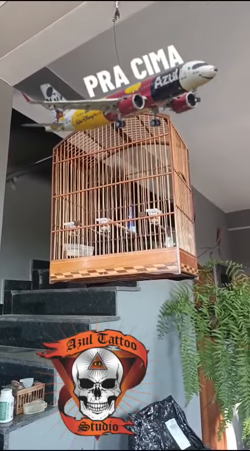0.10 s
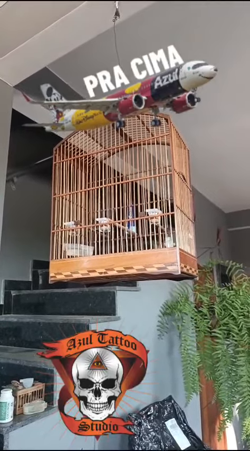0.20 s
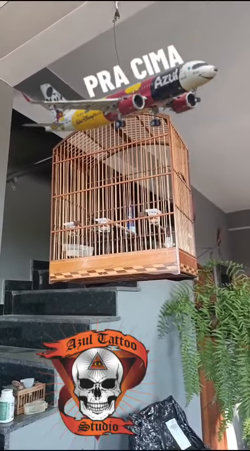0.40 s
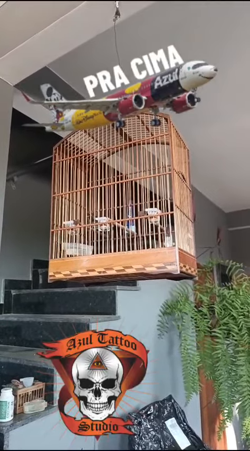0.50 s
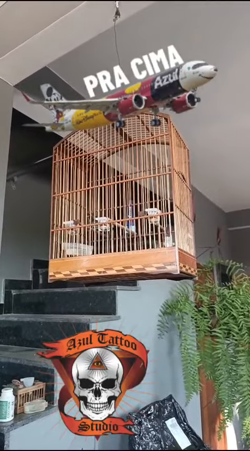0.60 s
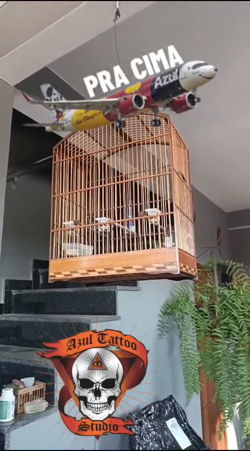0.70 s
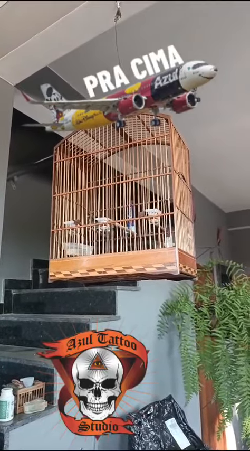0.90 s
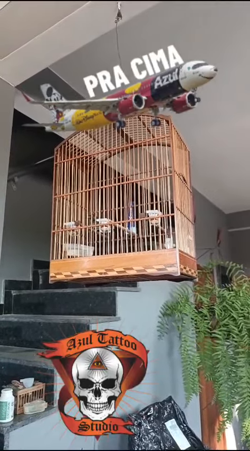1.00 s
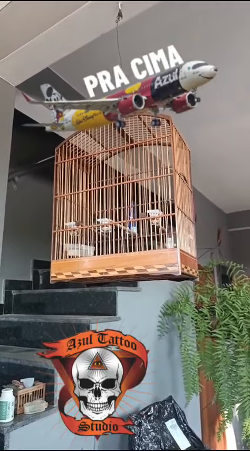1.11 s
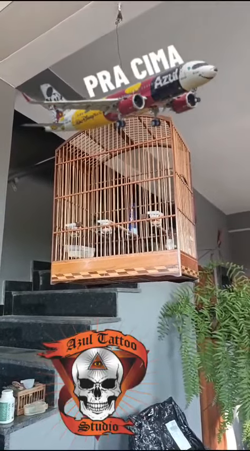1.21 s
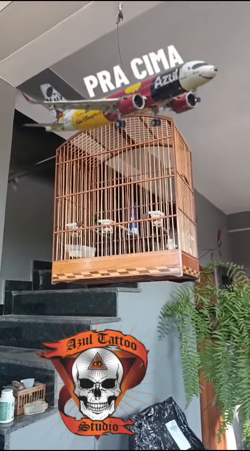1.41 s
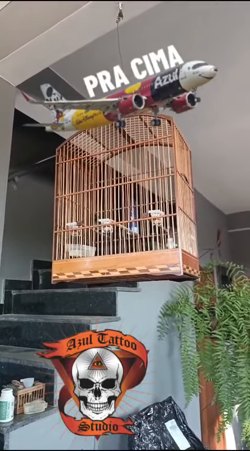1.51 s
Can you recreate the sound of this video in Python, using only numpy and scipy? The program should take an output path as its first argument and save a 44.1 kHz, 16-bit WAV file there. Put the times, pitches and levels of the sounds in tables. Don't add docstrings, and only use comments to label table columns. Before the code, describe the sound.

A small caged bird sings close by in a reverberant, hard-walled room. Thin falling chips tick from 0 to 0.2 seconds, with two tiny claw clicks on the perch. A fast buzz starts near 0.23, narrows to a piercing whistle by 0.37 and drops in two steps by 0.44. The echo fades; distant birds answer faintly, clearest around 0.7, over soft hum and far traffic.

```python
import sys
import numpy as np
from scipy import signal
from scipy.fft import rfft, irfft
from scipy.io import wavfile
from scipy.ndimage import uniform_filter1d

SR = 44100
rng = np.random.default_rng(int(sys.argv[2]) if len(sys.argv) > 2 else 0)


def volts_from_decibels(level):
    exponent = np.asarray(level, float) / 20
    return 10 ** exponent


def generate_wav(sig):
    pcm = np.round(np.clip(np.atleast_2d(sig).T, -1, 1) * 32767).astype(np.int16)
    wavfile.write(sys.argv[1], SR, pcm)


N = 68355
TOP_HZ = 15900

# (frequency [Hz], density [dB per Hz])
HOUSE_SPECTRUM = [(30, -29.5), (60, -9.5), (130, -0.5), (260, -10), (800, -17), (2300, -19), (6500, -36.5),
                  (16000, -48)]
# (frequency [Hz], decay time [s])
ROOM_T60 = [(2500, .95), (4000, .88), (5500, .8), (7700, .7), (10000, .72), (12500, .64), (16000, .5)]
# (time [s], length [s], first pitch [Hz], last pitch [Hz], level [dB])
FAR_NOTES = [(-.06, 0.069, 4503, 2790, -55.5), (0.025, 0.023, 3305, 2675, -50.5),
             (0.025, 0.06, 3797, 4283, -58), (0.045, 0.022, 3470, 2870, -60),
             (0.683, 0.025, 5940, 5500, -37), (.712, 0.01, 5480, 5060, -33.5),
             (0.738, 0.043, 4960, 3640, -43.5), (.91, 0.04, 2590, 3190, -55.5),
             (0.918, 0.02427, 5749, 5300, -82), (1.027, 0.04, 9350, 8000, -83),
             (1.155, 0.037, 6820, 7120, -71), (1.211, .022, 6050, 5070, -55.5),
             (1.251, 0.036, 5300, 3729, -64), (1.35, 0.0072, 3997, 3520, -74.5),
             (1.425, .03, 6860, 6000, -64), (1.449, 0.023, 6130, 4930, -58.5),
             (1.487, 0.033, 3570, 3830, -75)]
# (time [s], length [s], first pitch [Hz], last pitch [Hz], level [dB])
FAR_WHISTLE = [
    (0.786, 0.1, 4051, 3979, -52),
]
# (time [s], level [dB])
PERCH_TICKS = [
    (.048, -45),
    (.201, -42.5),
]
# (time [s], first pitch [Hz], last pitch [Hz], level [dB])
CHIPS = [
    (-.019, 10500, 9020, -39.5),
    (.023, 11070, 8820, -37.5),
    (.066, 11280, 8870, -36),
    (.107, 11610, 8860, -32),
    (.146, 10820, 8500, -36.5),
    (.206, 12250, 9770, -30.5),
    (1.544, 10800, 9000, -64),
]
# (time [s], low pitch [Hz], high pitch [Hz], low level [dB], high level [dB])
BUZZ = [
    (0.2259, 6543, 9073, -42.5, -30),
    (0.257, 6750, 8866, -26, -22.5),
    (0.299, 6883, 8416, -31, -26.5),
    (.335, 7070, 8148, -29, -23),
    (0.348, 7000, 7890, -33, -28),
    (0.368, 7000, 7680, -70.5, -21.5),
    (.39, 7000, 7680, -49.5, -20.5),
    (0.403, 7000, 7400, -72, -15.5),
    (0.404, 7000, 7620, -65.5, -54.5),
]
# (time [s], length [s], first pitch [Hz], last pitch [Hz], level [dB], octave level [dB])
DROP = [
    (.404, .006, 5950, 6250, -22, -20),
    (.409, .012, 6250, 6550, -17, -22),
    (.4215, .0125, 5700, 4700, -17, -36),
    (.433, .0105, 4780, 3900, -20, -36),
]
# (frequency [Hz], left over right [dB])
SHADOW = [(3500, 1.5), (6500, -9), (9000, -8.5), (12000, 7.5), (15500, 1.5)]
# (frequency [Hz], gain [dB])
MIC = [(6000, 2), (9500, 0.5), (11300, -5), (13000, 4), (15300, 3.5)]

EDGE_S, OCTAVE_DB = .0012, -14
DIRECT_DB, EARLY_DB = -2.5, 3


def along(table, hz):
    table = np.array(table)
    return np.interp(np.log(np.maximum(hz, 1)), np.log(table[:, 0]), table[:, 1])


def walk(rate_hz):
    hold = int(SR / rate_hz)
    steps = np.repeat(rng.standard_normal(N // hold + 2), hold)
    return 1.7 * uniform_filter1d(uniform_filter1d(steps, hold), hold)[:N]


def bands(lowest_hz, size):
    f = np.fft.rfftfreq(size, 1 / SR)
    count = int(3 * np.log2(TOP_HZ / lowest_hz)) + 2
    for hz in lowest_hz * 2 ** (np.arange(count) / 3):
        yield hz, np.clip(1 - np.abs(3 * np.log2(np.maximum(f, 1) / hz)), 0, 1)


def voice(hz, size, octave_db, under_db=-90):
    turn = 2 * np.pi * np.cumsum(hz) / SR
    octave = volts_from_decibels(octave_db) * (hz < SR / 5) * np.sin(2 * turn)
    undertone = volts_from_decibels(under_db) * np.sin(turn / 2)
    return np.sqrt(2) * size * (np.sin(turn) + octave + undertone)


def glides(t, notes, edge_s, wobble, octave_db, hook=0):
    out = np.zeros(len(t))
    for start, length, first_hz, last_hz, db in notes:
        on = (t > start) & (t < start + length)
        u = t[on] - start
        to_edge = np.minimum(u, length - u)
        size = volts_from_decibels(db) * np.sin(np.pi / 2 * np.clip(to_edge / edge_s, 0, 1)) ** 2
        slide = np.minimum(u / length / (1 - hook), 1)
        hz = (first_hz + (last_hz - first_hz) * slide) * (1 + wobble[on])
        out[on] += voice(hz, size, octave_db)
    return out


def house():
    alike_hz, level_db = 640, -52.5
    swell_db, flicker_db = .7, 1.2
    swell = walk(2.5)
    mid, side = rfft(rng.standard_normal((2, N)))
    f = np.fft.rfftfreq(N, 1 / SR)
    share = f ** 2 / (f ** 2 + alike_hz ** 2) / 2 + .03
    spread = np.sqrt(share) * side * np.array([[1], [-1]])
    pair = volts_from_decibels(along(HOUSE_SPECTRUM, f)) * (np.sqrt(1 - share) * mid + spread)
    out = 0
    for _, mask in bands(20, N):
        out = out + irfft(pair * mask, N) * volts_from_decibels(swell_db * swell + flicker_db * walk(8.3))
    return out * volts_from_decibels(level_db) / np.sqrt(np.mean(out ** 2))


def room(direct_db, early_db):
    early_t60_s, late_db = 0.36, 3.5
    gap_s, build_s = 0.0023, 0.027
    u = np.arange(SR) / SR

    def fade(t60):
        return np.exp(-np.log(1000) * u / t60) * np.sqrt(2 * np.log(1000) / SR)

    noise = rfft(rng.standard_normal((2, SR)))
    tail = sum(irfft(noise * mask, SR) * fade(along(ROOM_T60, hz)) for hz, mask in bands(840, SR))
    build = 1 - np.exp(-np.maximum(u - gap_s, 0) / build_s)
    early = rng.standard_normal((2, SR)) * fade(early_t60_s) / np.sqrt(early_t60_s) * (u > gap_s)
    out = tail * build * volts_from_decibels(late_db) + volts_from_decibels(early_db) * early
    out[:, 0] += volts_from_decibels(direct_db)
    return out


def far_birds(t):
    wobble = .014 * np.resize(walk(90), len(t))
    calls = glides(t, FAR_NOTES, 0.0066, wobble, -76.5)
    return calls + glides(t, FAR_WHISTLE, 0.027, 0 * t, -60.)


def perch_ticks(t):
    decay_s, low_cut_hz = .005, 1500
    size = sum(volts_from_decibels(db) * np.exp(-np.maximum(t - s, 0) / decay_s) * (t > s) for s, db in PERCH_TICKS)
    thin = signal.butter(2, low_cut_hz, "high", fs=SR, output="sos")
    return signal.sosfilt(thin, size * rng.standard_normal(len(t)))


def falling_chips(t):
    length_s, hook = .0075, .25
    notes = [(start, length_s, *rest) for start, *rest in CHIPS]
    return glides(t, notes, EDGE_S, 0 * t, OCTAVE_DB, hook)


def buzz_to_whistle(t):
    rate_hz, jitter, pulsing_ends_s, dip = 200, .012, .345, 0.67
    low_climb_hz, high_climb_hz, wobble = 520, 1193, .017
    sum_db, undertone_db = -3, -40
    s, low_hz, high_hz, low_db, high_db = np.array(BUZZ).T
    on = (t > s[0]) & (t < s[-1])
    u = t[on]
    cycle = np.cumsum(rate_hz * (1 + jitter * walk(60)[:len(u)])) / SR % 1
    buzzing = np.clip((pulsing_ends_s - u) / 0.014, 0, 1)
    throb = 1 - dip * buzzing * (1 - np.sin(np.pi * cycle) ** 4)
    bend = -buzzing * np.cos(np.pi * np.minimum(cycle / .85, (1 - cycle) / .15))
    low = np.interp(u, s, low_hz) + low_climb_hz * bend
    high = np.interp(u, s, high_hz) + high_climb_hz * bend
    high = high * (1 + wobble * walk(150)[:len(u)])
    low_size = volts_from_decibels(np.interp(u, s, low_db)) * throb
    high_size = volts_from_decibels(np.interp(u, s, high_db)) * throb
    sum_turn = 2 * np.pi * np.cumsum(low + high) / SR
    sum_tone = volts_from_decibels(sum_db) * np.sqrt(low_size * high_size) * np.sin(sum_turn)
    out = np.zeros(len(t))
    out[on] = voice(low, low_size, OCTAVE_DB) + voice(high, high_size, OCTAVE_DB, undertone_db) + sum_tone
    return out


def closing_drop(t):
    return sum(glides(t, [note[:5]], EDGE_S, 0 * t, note[5]) for note in DROP)


def phone_shadow(near):
    lag_s = .00005
    f = np.fft.rfftfreq(N, 1 / SR)
    side = np.array([[.5], [-.5]])
    shift = np.exp(4j * np.pi * f * lag_s * side)
    return irfft(rfft(near) * volts_from_decibels(side * along(SHADOW, f)) * shift, N)


def scene():
    lead = SR // 10
    t = (np.arange(N + lead) - lead) / SR
    floor = house()

    far = signal.fftconvolve(far_birds(t)[None], room(-20, 2.5), axes=1)[:, lead:lead + N]

    tick = perch_ticks(t)
    near = falling_chips(t) + buzz_to_whistle(t) + closing_drop(t) + volts_from_decibels(-5) * tick
    facing_s, facing_span_s, facing_echo_db = .385, .04, -5
    to_walls = volts_from_decibels(facing_echo_db * np.exp(-((t - facing_s) / facing_span_s) ** 4))
    facing = ((1 - to_walls) * near * volts_from_decibels(DIRECT_DB))[lead:]
    echoing = signal.fftconvolve((near * to_walls)[None], room(DIRECT_DB, EARLY_DB), axes=1)
    near = phone_shadow(echoing[:, lead:lead + N] + facing)
    return near + far + tick[lead:] + floor


def roll_off(x):
    return signal.sosfilt(signal.butter(12, 16480, fs=SR, output="sos"), x)


def record(dry):
    recover_db, recover_s, recover_span_s = 2.5, .98, .07
    x = irfft(rfft(dry) * volts_from_decibels(along(MIC, np.fft.rfftfreq(N, 1 / SR))), N)
    t = np.arange(N) / SR
    x = x * volts_from_decibels(recover_db / (1 + np.exp((recover_s - t) / recover_span_s)))
    x = signal.sosfilt(signal.ellip(8, .2, 70, TOP_HZ, fs=SR, output="sos"), x)
    return roll_off(x)


dry = scene()
out = record(dry)
generate_wav(out)
```